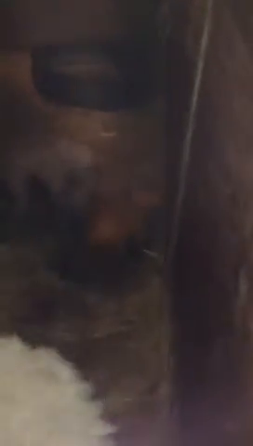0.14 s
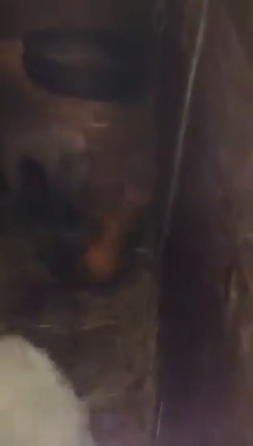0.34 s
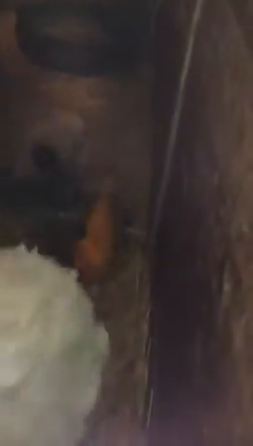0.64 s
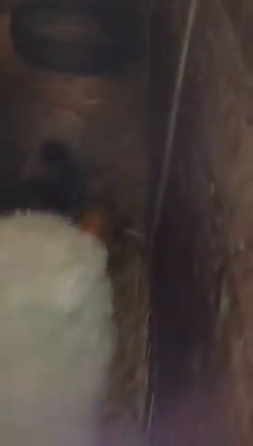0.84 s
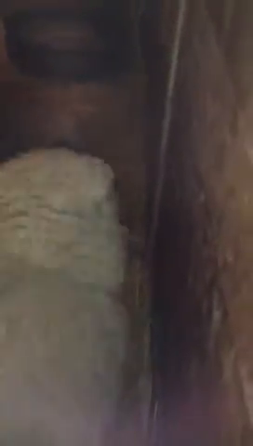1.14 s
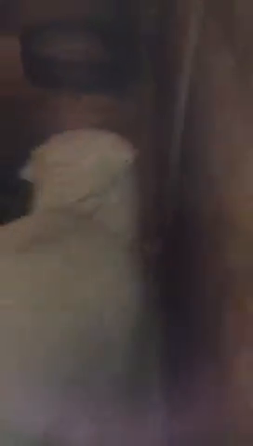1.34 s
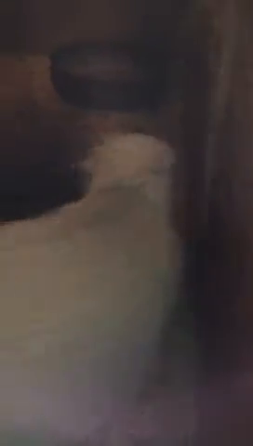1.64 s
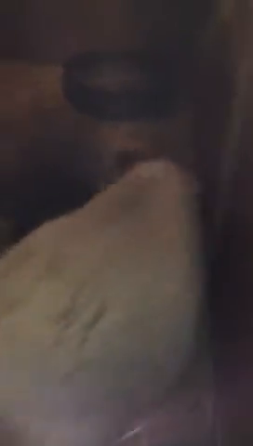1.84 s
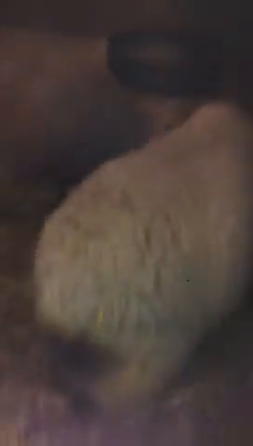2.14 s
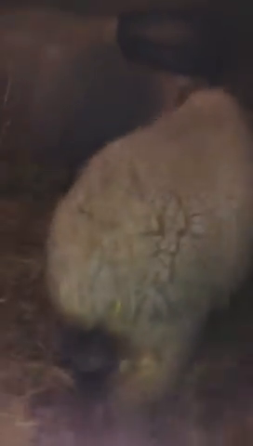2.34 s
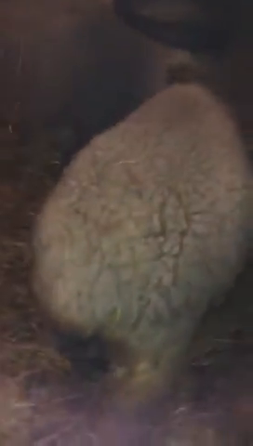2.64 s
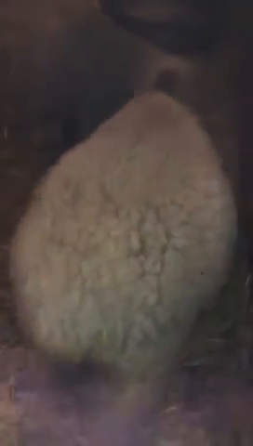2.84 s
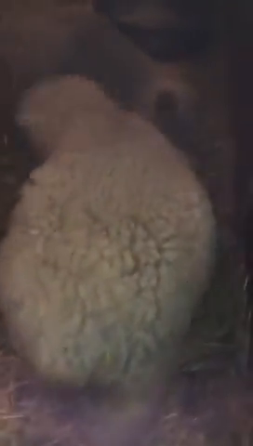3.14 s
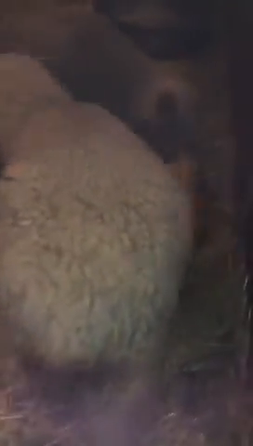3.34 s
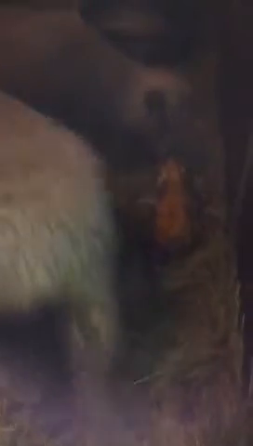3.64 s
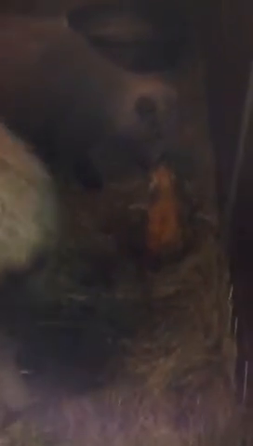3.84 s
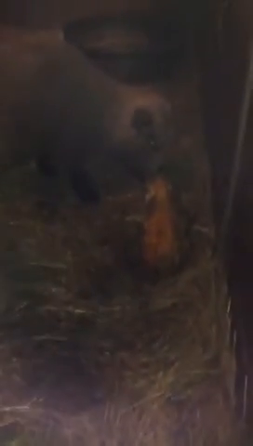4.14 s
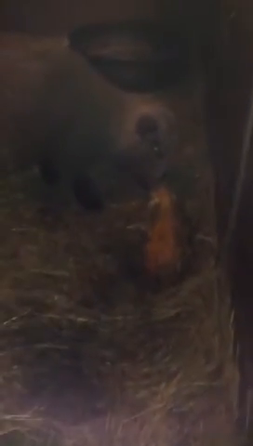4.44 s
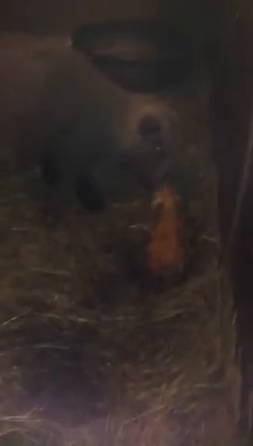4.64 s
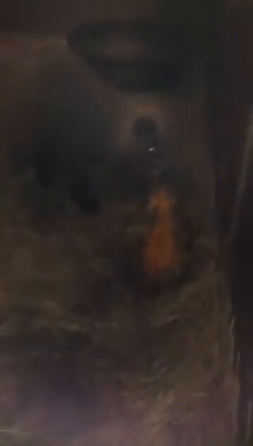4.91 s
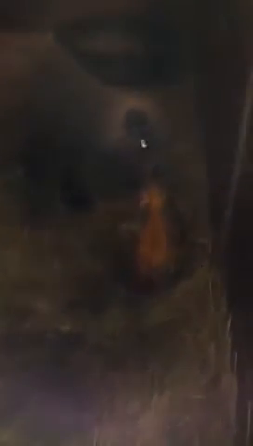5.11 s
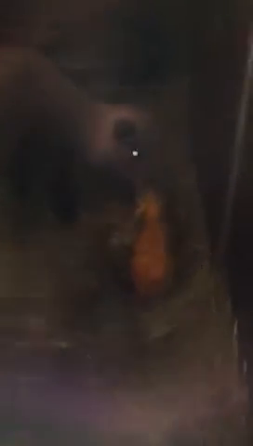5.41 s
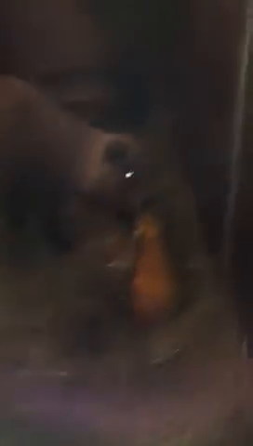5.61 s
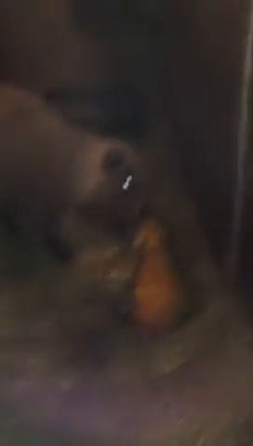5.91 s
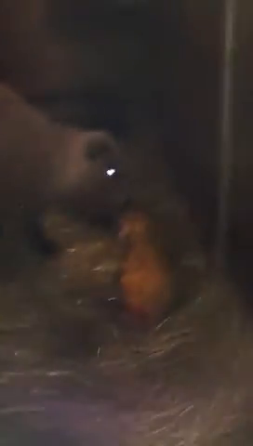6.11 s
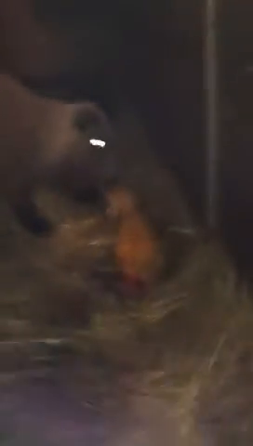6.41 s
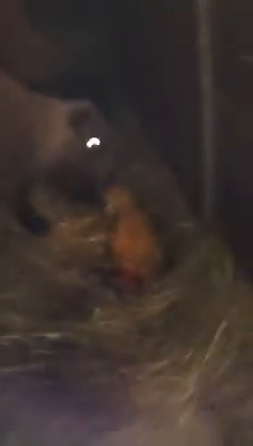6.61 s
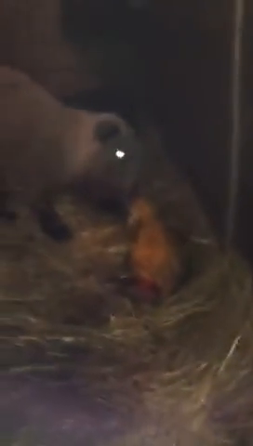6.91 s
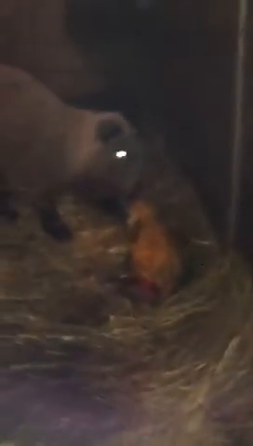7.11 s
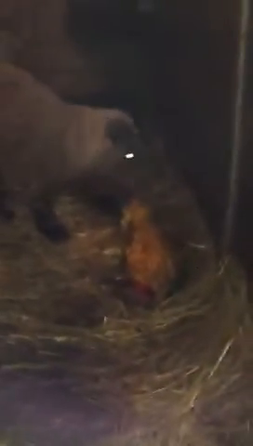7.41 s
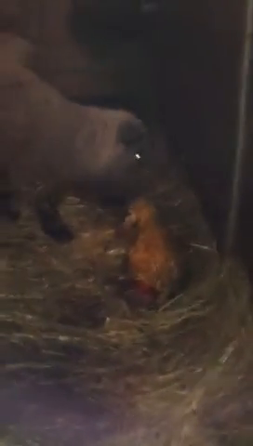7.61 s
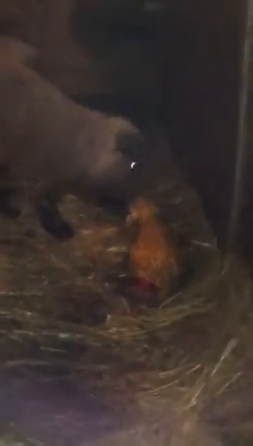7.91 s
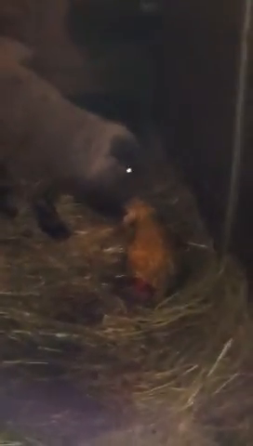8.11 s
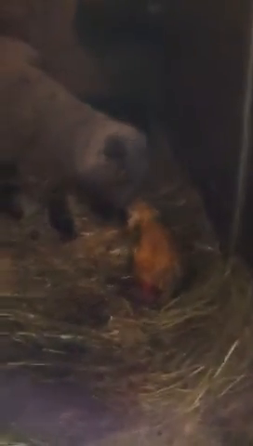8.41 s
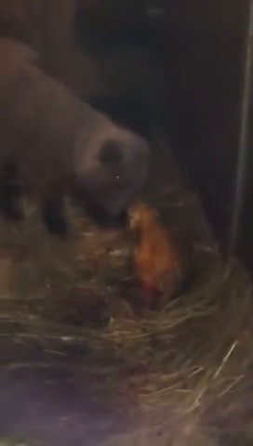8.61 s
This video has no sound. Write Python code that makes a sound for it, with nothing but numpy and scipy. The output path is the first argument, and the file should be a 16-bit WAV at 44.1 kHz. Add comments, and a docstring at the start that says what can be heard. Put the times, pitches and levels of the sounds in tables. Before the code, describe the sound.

Shrill throbbing lamb bleats, a ewe's rasping, breaking calls and one loud deep baa, with straw rustles and a sharp hoof knock in a barn.

```python
"""In a straw-bedded wooden pen, three sheep call over a faint hush of still air. Straw rustles and snaps, hooves
knock ringing boards, and each voice is a train of uneven pulses and air noise shaped by throat and mouth.
A lamb close by bleats in shrill throbs, about eleven a second. A hoarse ewe further off ends one bleat, then
answers twice, her voice breaking towards the end of each answer. A deeper ewe gives one loud baa, and her
low murmuring grunts lead into it and close the scene."""
import sys
import numpy as np
from scipy import signal
from scipy.fft import rfft, irfft, next_fast_len
from scipy.io import wavfile
from scipy.ndimage import uniform_filter1d, map_coordinates

SR = 44100
rng = np.random.default_rng(int(sys.argv[2]) if len(sys.argv) > 2 else 0)


def materialize(psi):
    """Save the field psi as 16-bit PCM at rate SR to the path in sys.argv[1].

    A 1-D psi becomes a single channel; in a 2-D psi each row is a channel.
    """
    bounded = np.clip(np.atleast_2d(psi).T, -1, 1)
    quanta = np.round(bounded * 32767).astype(np.int16)
    wavfile.write(sys.argv[1], SR, quanta)


N = 385875
TIME = np.arange(N) / SR


def amp(db):
    """Decibels to gain."""
    return 10 ** (np.asarray(db) / 20)


def unit(x):
    """Scale to rms 1."""
    return x / np.sqrt(np.mean(x ** 2) + 1e-20)


def along(points, hz):
    """Read (frequency [Hz], value) points on a log frequency axis."""
    f, v = np.transpose(points)
    return np.interp(np.log(hz + 1), np.log(f + 1), v)


def curves(rows):
    """One value per sample for each column after the time."""
    s, *cols = np.transpose(rows)
    return [np.interp(TIME, s, c) for c in cols]


def during(rows):
    """1 while a table lasts, with short fades outside it."""
    start, end = rows[0][0], rows[-1][0]
    return np.interp(TIME, [start - .02, start, end, end + 0.0062], [0, 1, 1, 0])


def wobble(rate):
    """A smooth random curve, rate knots a second."""
    knots = rng.standard_normal(int(N * rate / SR) + 4)
    coarse = TIME[::16]
    return np.interp(TIME, coarse, map_coordinates(knots, [coarse * rate], order=2))


def swells(times, levels_db, widths):
    """A gain curve with one bell-shaped swell for each event; overlapping swells add in power."""
    coarse = TIME[::40]
    bells = np.exp(-((coarse[:, None] - times) / widths) ** 2)
    return np.interp(TIME, coarse, np.sqrt(bells @ amp(levels_db) ** 2))


def colour(x, points):
    """Causal (minimum-phase) filter through (frequency [Hz], level [dB]) points, closed at both ends; rms 1."""
    m = 2 * next_fast_len(N // 2 + 4096)
    closed = [(points[0][0] / 2, -80), *points, (points[-1][0] * 1.5, -80)]
    log_gain = np.log(amp(along(closed, np.fft.rfftfreq(m, 1 / SR))))
    cepstrum = irfft(log_gain, m)
    # folding the cepstrum onto positive time makes the filter causal
    cepstrum[1:m // 2] *= 2
    cepstrum[m // 2 + 1:] = 0
    response = np.exp(rfft(cepstrum))
    return unit(irfft(rfft(x, m) * response, m)[:N])


def noise(points):
    """Coloured noise of rms 1."""
    return colour(rng.standard_normal(N), points)


# how long the boards answer: (frequency [Hz], 60 dB decay time [s])
PEN_DECAY = [(150, 0.28), (700, 0.56), (2500, 0.37), (6000, 0.3), (13000, 0.13)]


def in_pen(x, wet_db):
    """Direct sound plus the boards' short answer of decaying noise, balanced to hold the total power."""
    hz, t, z = signal.stft(rng.standard_normal(SR // 2), SR, nperseg=256)
    decay = amp(-60 * t / along(PEN_DECAY, hz)[:, None])
    tail = signal.istft(z * decay, SR, nperseg=256)[1]
    delayed = np.pad(tail, (150, 0)) / np.linalg.norm(tail)  # delay in samples
    answer = signal.fftconvolve(x, delayed)[:N]
    return (x + amp(wet_db) * answer) / np.hypot(1, amp(wet_db))


# tone of the still air: (frequency [Hz], relative level [dB])
AIR_TONE = [(15, -66), (25, -34), (172, -5.5), (475, -8.5), (515, -13), (709, -12), (833, -13),
            (978, -14.5), (1210, -15.5), (1540, -16.5), (2700, -18), (9270, -23), (15000, -25)]


def still_air():
    """The faint hush of the pen: coloured noise whose level wavers slightly."""
    return amp(-65.0 + 1.8 * wobble(11.0)) * noise(AIR_TONE)


# feet shuffling in the bedding, levels before a small trim:
# (time [s], swell width [s], straw level [dB], tread level [dB])
STEPS = [(0.5, 0.06, -66, -67), (0.81, 0.082, -61, -63.5), (1.208, 0.051, -56, -80),
         (1.364, 0.047, -62.5, -78), (1.733, 0.15, -67.5, -81), (3.677, 0.054, -57, -71),
         (3.826, 0.03, -66, -72), (4.07, 0.029, -58, -83), (4.21, 0.047, -57, -81), (4.924, 0.16, -60, -65),
         (5.147, 0.096, -61.5, -64.5), (8.698, 0.069, -57.5, -68)]
# tone of rustling straw: (frequency [Hz], relative level [dB])
STRAW_TONE = [(600, -27), (2000, -12), (5500, -1.5), (8000, -2), (10000, -12), (14000, -4), (15300, -14)]
# tone of the dull footfall: (frequency [Hz], relative level [dB])
TREAD_TONE = [(40, -41), (110, -3), (200, -1.5), (450, -1.5), (900, -3.5), (2500, -15.5), (6000, -46)]


def bedding():
    """Each step crackles in the straw, as jagged bright noise, over a soft, dull tread."""
    s, width, straw_db, tread_db = np.transpose(STEPS)
    crackle = unit(noise(STRAW_TONE) * amp(2.7 * wobble(500) + 0.89 * wobble(52)))
    tread = unit(noise(TREAD_TONE) * amp(4 * wobble(30)))
    straw_part = crackle * swells(s, straw_db - .5, width)
    tread_part = tread * swells(s, tread_db - .5, width)
    return in_pen(straw_part + tread_part, wet_db=-12.5)


# dry stalks breaking: (time [s], level [dB])
SNAPS = [(0.451, -67), (1.71, -58), (4.031, -49.5)]
# tone of a breaking stalk: (frequency [Hz], relative level [dB])
STALK_TONE = [(700, -36), (1500, -1.5), (2400, -10), (3300, 9), (4500, 9), (9000, -15)]


def snaps(t60=0.05):
    """A stalk gives way with a sharp, quickly dying crackle."""
    bursts = sum((TIME >= s) * amp(db - 60 * np.abs(TIME - s) / t60) for s, db in SNAPS)
    crackle = unit(noise(STALK_TONE) * amp(2.5 * wobble(400)))
    return in_pen(bursts * crackle, wet_db=-11)


# hooves against the boards: (time [s], level [dB])
KNOCKS = [(.79, -59), (4.985, -59), (5.2, -55), (6.335, -26)]
# ringing modes of a board: (frequency [Hz], typical relative level [dB], 60 dB decay time [s])
BOARD_MODES = [(168, -25, 0.076), (684, -16, .04), (1099.8, -7, .035), (1674, 0.5, 0.041), (2060, -7, .02),
               (3299, -10, 0.011)]


def knocks(attack_s=0.00098):
    """A hoof strikes a board, whose modes ring briefly, in a slightly different balance at each blow."""
    blows = np.zeros(N + SR)
    t = TIME[:SR // 4]
    for s, db in KNOCKS:
        ring = 0
        for hz, level, t60 in BOARD_MODES:
            decay = amp(level + rng.normal(0, 1.8) - 60 * t / t60)
            ring = ring + decay * np.sin(2 * np.pi * hz * t)
        blows[round(s * SR):][:len(t)] += amp(db) * ring * (1 - np.exp(-t / attack_s))
    # a narrow board sheds no deep bass
    radiated = signal.sosfilt(signal.butter(2, 130, "high", fs=SR, output="sos"), blows[:N])
    return in_pen(radiated, wet_db=-9)


def larynx(pitch, jitter, shimmer_db, rough):
    """Pulses of uneven spacing and size, with a share of air noise let through once a cycle."""
    cycles = np.cumsum(pitch * (1 + jitter * wobble(170))) / SR
    at = np.interp(np.arange(1, int(cycles[-1])), cycles, np.arange(N))
    # windowed sincs place each pulse between samples
    taps = at.astype(int)[:, None] + np.arange(-7, 9)
    offset = taps - at[:, None]
    shapes = np.sinc(offset) * np.cos(np.pi * offset / 16) ** 2
    pulses = np.bincount(np.clip(taps, 0, N).ravel(), shapes.ravel(), N + 1)[:N]
    air = rng.standard_normal(N) * (1 + np.cos(2 * np.pi * cycles)) ** 2
    share = np.clip(rough, 0, 1)
    source = np.sqrt(1 - share) * unit(pulses) + np.sqrt(share) * unit(air)
    return source * amp(shimmer_db * wobble(150))


def chest_tone(pitch, jitter):
    """The bare fundamental as a sine of uneven pitch, rms 1."""
    cycles = np.cumsum(pitch * (1 + jitter * wobble(90))) / SR
    return np.sqrt(2) * np.sin(2 * np.pi * cycles)


def near_walls(x, echo_db, sway_s, count=5):
    """Reflections off the nearest boards; paths shift as the head turns, so each harmonic swells and fades."""
    delays = [rng.uniform(.0007, .009) + sway_s * wobble(5) for _ in range(count)]
    echoes = sum(map_coordinates(x, [(TIME - delay) * SR], order=2) for delay in delays)
    return (x + amp(echo_db) * echoes / np.sqrt(count)) / np.hypot(1, amp(echo_db))


def throb_times(first, last, slowing, period):
    """The throbs of one bleat: even without slowing, otherwise quick at first and then drawing apart."""
    u = np.linspace(0, 1, round((last - first) / period) + 1)
    return first + (last - first) * (u - slowing * u * (1 - u))


# the deep ewe's grunts, levels before a small trim:
# (time [s], swell width [s], hum level [dB], mouth level [dB])
GRUNTS = [(6.8, 0.019, -46, -62), (6.877, 0.029, -49, -60), (8.474, 0.017, -52, -71),
          (8.53, 0.017, -58, -85), (8.593, 0.053, -55.5, -76), (8.699, 0.019, -49.5, -59),
          (8.75, .02, -56, -60)]


def grunt():
    """The deep ewe rumbles with her mouth shut: slow, uneven pulses in a low resonance."""
    s, width, hum_db, mouth_db = np.transpose(GRUNTS)
    pulses = larynx(np.full(N, 88.), jitter=0.18, shimmer_db=0.0, rough=0.28)
    hum = colour(pulses, [(75, -29), (110, -13), (150, -5.5), (190, 2.5), (230, 0.5), (320, -15)])
    mouth = colour(pulses, [(350, -12), (600, 5), (800, -8), (1600, -32)])
    hum_part = hum * swells(s, hum_db + 0.5, width)
    mouth_part = mouth * swells(s, mouth_db + 0.51, width)
    return in_pen(hum_part + mouth_part, wet_db=0)


# the deep ewe's baa: (time [s], pitch before vibrato [Hz], reference level [dB])
DEEP_BAA = [(6.85, 161.7, -49), (6.92, 166.4, -36.5), (7.01, 193.3, -31), (7.1, 205.4, -30.5),
            (7.21, 226.7, -27.5), (7.34, 235.2, -29.5), (7.52, 221.7, -29.5), (7.665, 206, -31),
            (7.78, 187.3, -57)]
# her mouth goes from shut to open: (start [s], end [s])
DEEP_OPENS_S = [6.945, 7.04]
# tone of her vowel: (frequency [Hz], relative level [dB])
DEEP_MOUTH = [(250, -26), (400, -10), (470, -5), (560, -3.5), (700, 2), (900, -9.5), (1170, -17),
              (1400, -33), (1800, -36.5)]
# tone of her rasp: (frequency [Hz], relative level [dB])
DEEP_RASP = [(900, -21.5), (1400, -9.5), (1750, 1.5), (2150, -10), (2600, 0.5), (3050, -8), (3700, -16),
             (4400, -20), (5000, -16.5), (6300, -19), (7000, -28), (10000, -44.5), (12500, -37.5),
             (15000, -59)]
# the vowel fills out towards the top of her pitch: (pitch [Hz], level relative to the baa [dB])
DEEP_VOWEL = [(170, -5), (205, -7.5), (226, -6.5), (235, -2)]
# the fundamental drops out as it glides through a narrow notch: (pitch [Hz], level relative to the baa [dB])
DEEP_CHEST = [(168, -5), (192, -17), (200, -34), (207, -17), (235, -17.5)]
DEEP_THROB_HZ, DEEP_CREST_S = 11.3, 7.315  # throbs a second, and the time of the strongest
DEEP_THROB_SPAN_S = 0.21  # the throbbing grows and dies away over this time around the crest
DEEP_THROB_DB, DEEP_RASP_THROB_DB = 3, 0.5  # swing of the vowel and of the rasp at the crest


def deep_ewe(vibrato=0.012):
    """The baa starts as a closed-mouth hum, opens into a bright, throbbing vowel and sinks again."""
    pitch, db = curves(DEEP_BAA)
    from_crest = TIME - DEEP_CREST_S
    throb = np.cos(2 * np.pi * DEEP_THROB_HZ * from_crest) * np.exp(-(from_crest / DEEP_THROB_SPAN_S) ** 2)
    opening = np.interp(TIME, DEEP_OPENS_S, [0, 1])
    chest_db = db + along(DEEP_CHEST, pitch)
    mouth_db = db + along(DEEP_VOWEL, pitch) + DEEP_THROB_DB * throb
    rasp_db = db + DEEP_RASP_THROB_DB * throb
    pitch = pitch * (1 + vibrato * throb + .005 * wobble(30))
    mouth = colour(larynx(pitch, jitter=0.012, shimmer_db=2.0, rough=0.0059), DEEP_MOUTH)
    rasp = colour(larynx(pitch, jitter=.015, shimmer_db=2.5, rough=.14), DEEP_RASP)
    low = amp(chest_db) * chest_tone(pitch, jitter=0.025) + opening * amp(mouth_db) * mouth
    high = near_walls(opening * amp(rasp_db) * rasp, echo_db=-2.0, sway_s=.0001)
    return in_pen((low + high) * during(DEEP_BAA), wet_db=-5)


# the hoarse ewe's bleats: (first throb [s], last throb [s], slowing [0-1])
EWE_BLEATS = [(.01, 0.198, 0), (2.126, 3.455, 0.26), (5.826, 6.98, .06)]
# her voice through each of them: (time [s], pitch before sag [Hz], vowel level [dB], rasp level [dB])
EWE_VOICE = [(.01, 313, -51, -50), (.195, 302, -69, -69), (2.125, 270, -75, -72), (2.2, 259, -49, -40),
             (2.46, 253, -40.5, -38.5), (2.75, 267, -43, -40.5), (2.98, 324, -42, -39.5),
             (3.22, 315.7, -42, -44.5), (3.456, 281, -60, -65), (5.825, 276, -68, -67),
             (5.925, 240, -48, -44), (6.03, 260, -42.5, -40), (6.3, 276, -37, -37.5),
             (6.44, 326, -39, -37.5), (6.65, 335.6, -43, -38.5), (6.979, 318.6, -43.5, -41.5)]
# tone of her clear vowel: (frequency [Hz], relative level [dB])
EWE_MOUTH = [(380, -35), (510, -23.5), (630, -20), (770, -10), (890, -12), (1030, 0.5), (1280, -18),
             (1550, -14), (1800, -30.5), (2080, -10), (2550, -20), (3100, -17.5), (3700, -17)]
# tone of her broken vowel: (frequency [Hz], relative level [dB])
EWE_BROKEN = [(400, -61), (530, -8), (670, -5), (760, -2.5), (870, 2), (1020, 0.5), (1250, -5.5),
              (1620, -1), (2000, -28)]
# tone of her rasp: (frequency [Hz], relative level [dB])
EWE_RASP = [(1300, -40), (1700, -10), (2100, -4), (2550, -5.5), (3150, -3.5), (3400, -4), (3950, 4.5),
            (4400, -5), (5300, -5.5), (5620, -17.5), (6250, -8), (6800, -14.5), (7700, -17.5), (9000, -31),
            (14000, -34.5)]
# her voice breaks outside its easy range: (pitch [Hz], breaking [0-1])
EWE_BREAKS = [(240, 0.59), (252, .07), (273, .1), (288, .48), (320, .9)]
# her chest tone grows with the pitch: (pitch [Hz], level at full voice [dB])
EWE_CHEST = [(240, -70), (258, -61), (275, -57), (320, -51)]
EWE_THROB_S = .102  # nominal spacing, rounded to fit each bleat
EWE_FULL_DB = -42  # vowel level of her full voice
EWE_CHEST_FOLLOWS = 0.22  # how much of the vowel's level the chest tone follows


def hoarse_ewe(steady_s=.052, flutter_s=.028, chest_s=0.025, lead_s=0.006, sag=.03):
    """A clear low stack under a harsh rasp; as the voice breaks, pulses scatter and throbs narrow apart."""
    s = np.concatenate([throb_times(*bleat, EWE_THROB_S) for bleat in EWE_BLEATS])
    at, *controls = np.transpose(EWE_VOICE)
    hz, vowel_db, rasp_db = [np.interp(s, at, control) for control in controls]
    breaks = np.clip(along(EWE_BREAKS, hz), 0, 1)
    breaking = np.interp(TIME, s, breaks)
    chest_db = along(EWE_CHEST, hz) + EWE_CHEST_FOLLOWS * (vowel_db - EWE_FULL_DB)
    widths = steady_s + (flutter_s - steady_s) * breaks

    def throbs(db):
        """One swell a throb."""
        return swells(s - lead_s, db, widths)

    push = np.minimum(throbs(0 * s), 1)
    pitch = np.interp(TIME, s, hz) * (1 + 2 * sag * (push - 1) + 0.00798 * wobble(28))  # sags between throbs
    clear = colour(larynx(pitch, jitter=.01 + .022 * breaking, shimmer_db=2.2, rough=.015), EWE_MOUTH)
    broken = colour(larynx(pitch, jitter=.055, shimmer_db=4, rough=0.38), EWE_BROKEN)
    rasp_source = larynx(pitch, jitter=.0105 + .022 * breaking, shimmer_db=2, rough=.16 + .3 * breaking)
    rasp = colour(rasp_source, EWE_RASP)
    vowel = np.sqrt(1 - breaking) * clear + np.sqrt(breaking) * broken
    chest = chest_tone(pitch, jitter=0.036 + 0.053 * breaking)
    grit = unit(amp(1.9 * wobble(85)))  # the slack folds rattle
    chest_part = chest * swells(s - lead_s, chest_db, chest_s)
    voice = grit * (chest_part + vowel * throbs(vowel_db) + rasp * throbs(rasp_db))
    return in_pen(voice, wet_db=2)


def arch(start_middle_end, count):
    """A parabola through three values, read once for each throb."""
    return np.polyval(np.polyfit([0, .5, 1], start_middle_end, 2), np.linspace(0, 1, count))


# the mouth's tones come forward as the pitch sinks: (pitch [Hz], added level [dB])
LAMB_GAPE = [(385, 12.5), (418, -1.5)]
LAMB_THROB_S = .092  # nominal spacing, rounded to fit each bleat
LAMB_SHUT_DB = -8.5  # the mouth is still half shut on the first throb


def lamb_throbs(bleat):
    """Time, pitch, level and open-mouth tone of each throb in one bleat."""
    timing, pitches, levels = bleat[:3], bleat[3:6], bleat[6:9]
    falter_db, mouth_db = bleat[9:]
    s = throb_times(*timing, LAMB_THROB_S)
    first = s == s[0]
    hz = arch(pitches, len(s))
    db = arch(levels, len(s)) + falter_db * first
    return s, hz, db, mouth_db + along(LAMB_GAPE, hz) + LAMB_SHUT_DB * first


# the lamb's bleats; pitch (before sag) and level (before a small trim) arch over the throbs:
# (first throb [s], last throb [s], slowing [0-1], pitch at start, middle, end [Hz],
#  level at start, middle, end [dB], faltering of the first throb [dB],
#  open-mouth tone relative to the level, before gape [dB])
LAMB_BLEATS = [(.01, .118, 0, 403, 385, 363, -42, -45, -50, 0, -14),
               (.929, 1.128, .33, 418, 433, 387, -39.5, -37, -44, 0, -18),
               (1.852, 2.21, .24, 422, 455, 412, -34.5, -25.8, -32, -3, -16.5),
               (3.068, 3.436, .02, 426, 433, 376, -37.5, -31.3, -45, 0, -21),
               (4.388, 4.753, .04, 432, 443, 427, -33.5, -29.3, -29.5, -10, -15.5),
               (5.378, 5.816, .08, 421, 437, 448, -34, -36, -29.5, -12, -15),
               (5.915, 6.172, 0, 410, 411, 428, -36.5, -37.5, -31.5, 0, -19),
               (6.8, 7.05, .15, 425, 439, 414, -40, -33, -40, 0, -19),
               (7.675, 8.033, .06, 437, 442, 442, -30, -29.3, -27.5, 0, -23.5)]
# tone of the shrill throat: (frequency [Hz], relative level [dB])
LAMB_THROAT = [(2200, -17.5), (2650, -16), (3050, -15), (3500, 2), (3920, -8), (4400, -4.5), (4830, 4),
               (5300, 2.5), (5900, 5.5), (6600, -2.5), (7200, -3.5), (8600, -9.5), (10000, -18.5),
               (12000, -23), (13500, -35), (15000, -34)]
# tone of the open mouth: (frequency [Hz], relative level [dB])
LAMB_MOUTH = [(300, -5), (435, -13), (870, -17.5), (1330, 2.5), (1760, -6.5), (2200, -14.5), (2700, -14.5),
              (3400, -15)]
# the folds sound from this long before the first throb to this long after the last
LAMB_CATCH_S, LAMB_RELEASE_S = 0.062, .15


def lamb(throb_s=.0245, mouth_s=0.014, lead_s=0.0074, mouth_lead_s=0.0096, sag=.026, bright_lag_s=0.0029):
    """Each push lifts pitch and level; the mouth's low tones open first, the top overtones last."""
    s, hz, db, mouth_db = np.hstack([lamb_throbs(bleat) for bleat in LAMB_BLEATS])
    push = swells(s - mouth_lead_s, 0 * db, throb_s)
    pitch = np.interp(TIME, s, hz) * (1 + 2 * sag * (push - .9) + 0.00295 * wobble(40))
    airy = np.interp(TIME, s, np.interp(db, [-52, -40], [.4, .015]))  # the feebler the throb, the more air
    shrill = colour(larynx(pitch, jitter=.007, shimmer_db=1.1, rough=airy), LAMB_THROAT)
    top = signal.sosfiltfilt(signal.butter(3, 6400, "high", fs=SR, output="sos"), shrill)
    mouth = colour(larynx(pitch, jitter=.004, shimmer_db=.8, rough=.002), LAMB_MOUTH)
    middle_part = (shrill - top) * swells(s - lead_s, db + 0.5, throb_s)
    top_part = top * swells(s + bright_lag_s, db + 1.5, throb_s)
    mouth_part = mouth * swells(s - mouth_lead_s, db + mouth_db, mouth_s)
    voice = near_walls(middle_part + top_part, echo_db=4, sway_s=.00007, count=7) + mouth_part
    # the folds catch abruptly just before the first throb of a bleat
    spans = [(TIME > first - LAMB_CATCH_S) & (TIME < last + LAMB_RELEASE_S) for first, last, *_ in LAMB_BLEATS]
    voiced = np.any(spans, axis=0)
    return in_pen(voice * uniform_filter1d(voiced * 1., 600) ** 2, wet_db=-8)


def scene():
    """The flock and its bedding over the faint hush of the pen."""
    surroundings = still_air() + bedding() + snaps() + knocks()
    flock = grunt() + deep_ewe() + hoarse_ewe() + lamb()
    return (surroundings + flock)[None]


TOP_HZ = 15300


def record(dry):
    """Cut everything above the band limit, steeply."""
    m = next_fast_len(N + 8192)
    kept = np.fft.rfftfreq(m, 1 / SR) < TOP_HZ
    return irfft(rfft(dry, m) * kept, m)[..., :N]


dry = scene()
out = record(dry)
materialize(out)
```